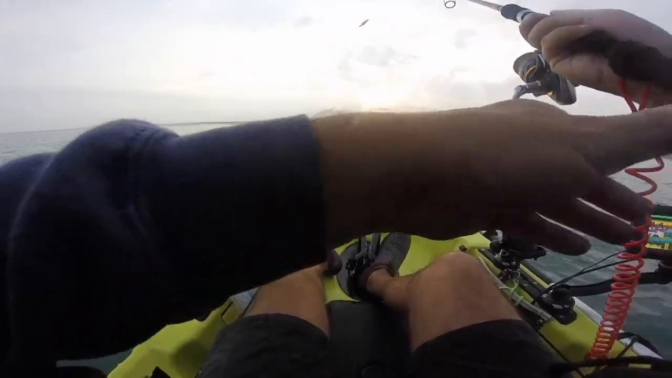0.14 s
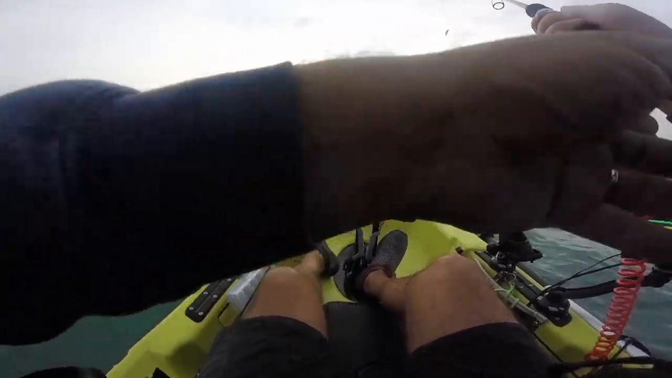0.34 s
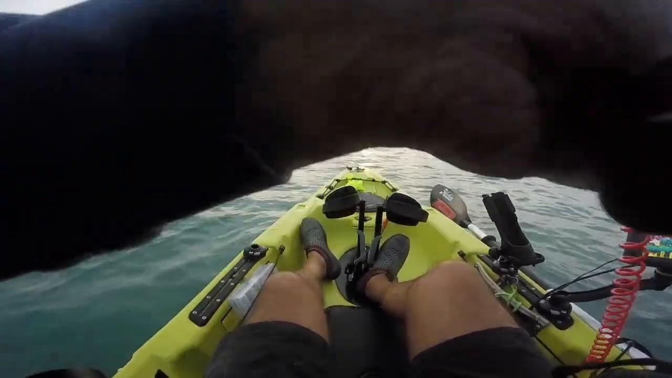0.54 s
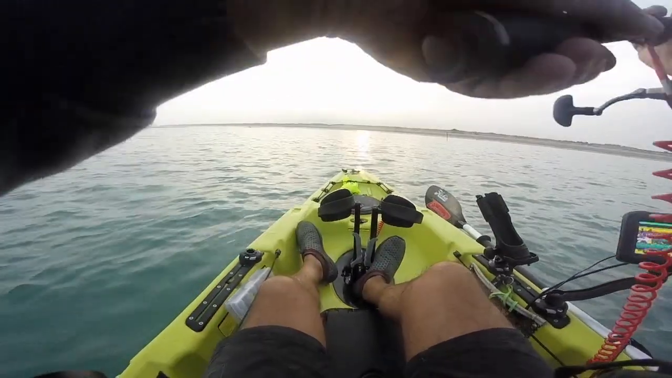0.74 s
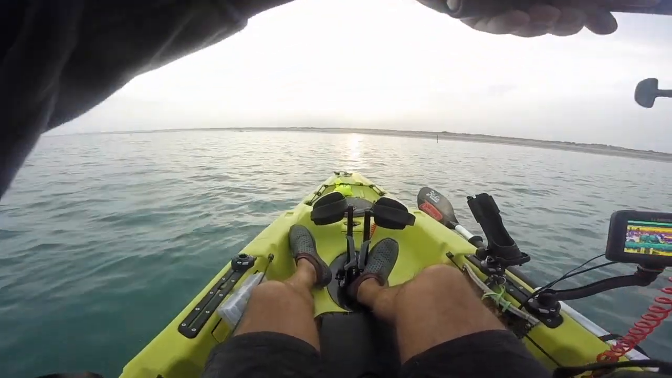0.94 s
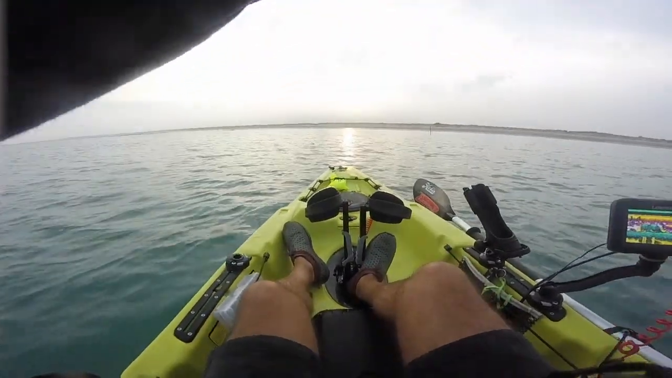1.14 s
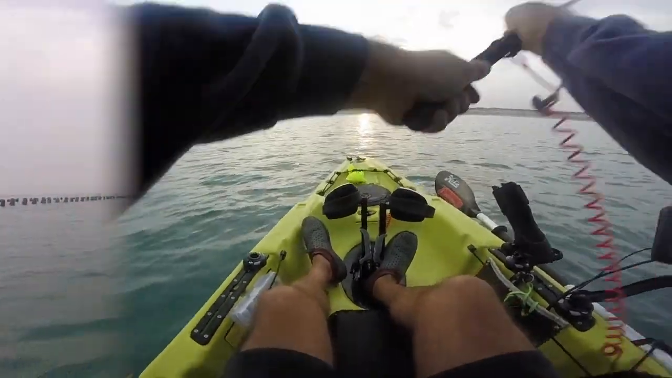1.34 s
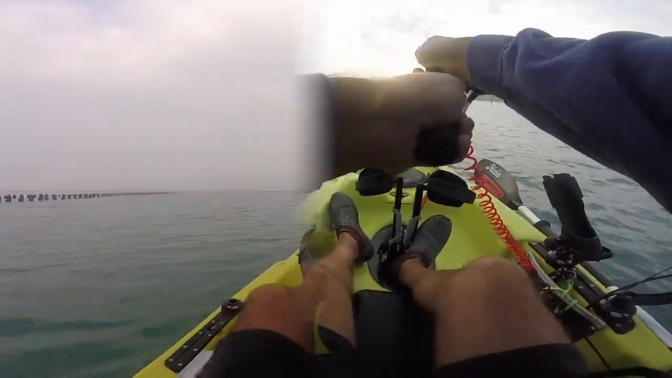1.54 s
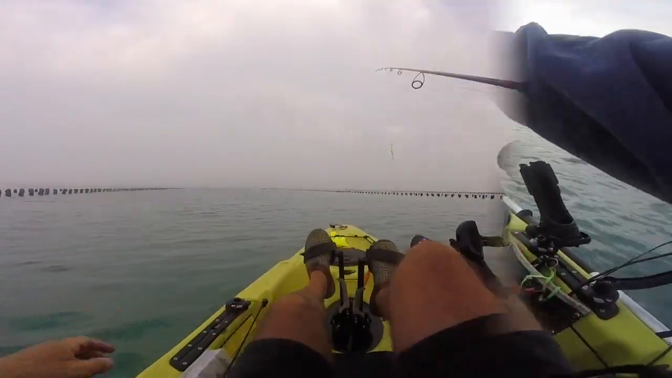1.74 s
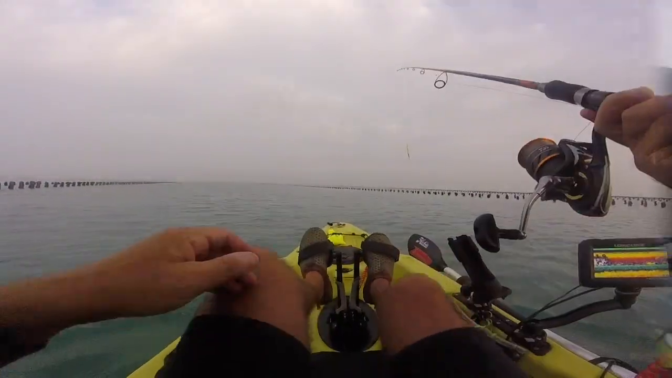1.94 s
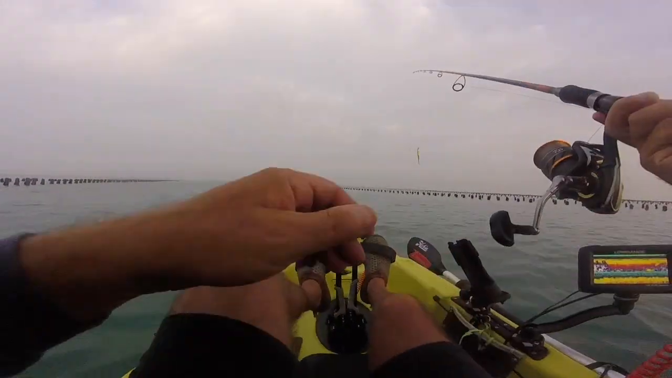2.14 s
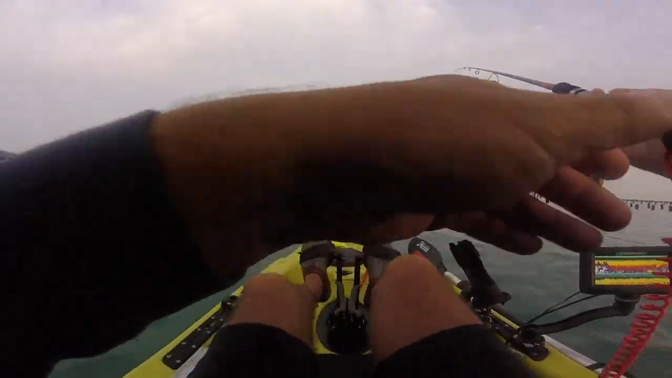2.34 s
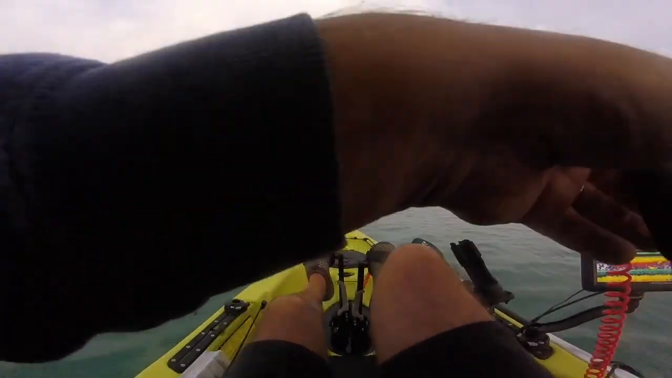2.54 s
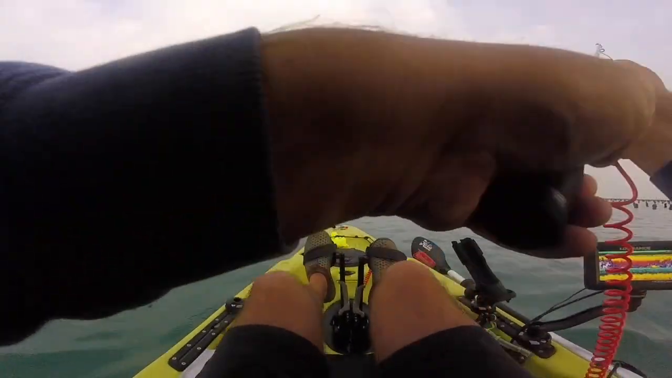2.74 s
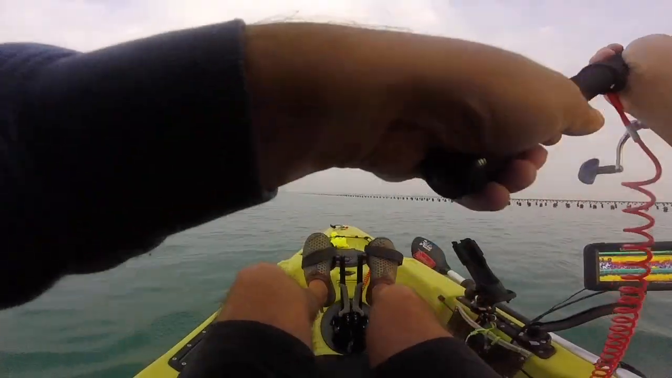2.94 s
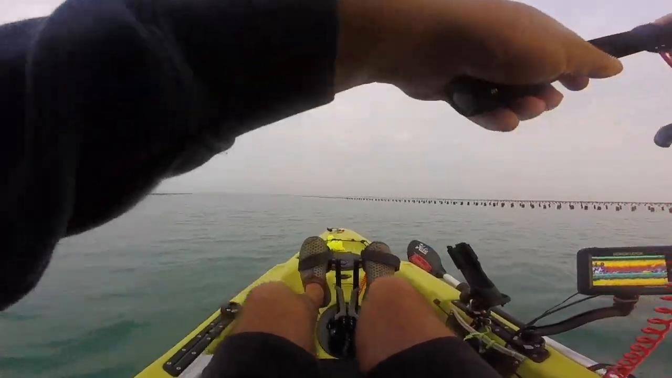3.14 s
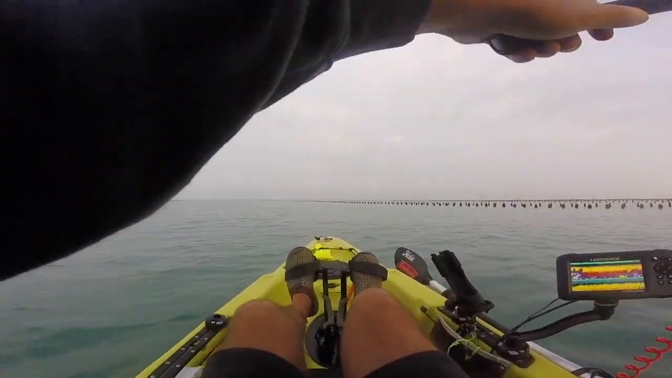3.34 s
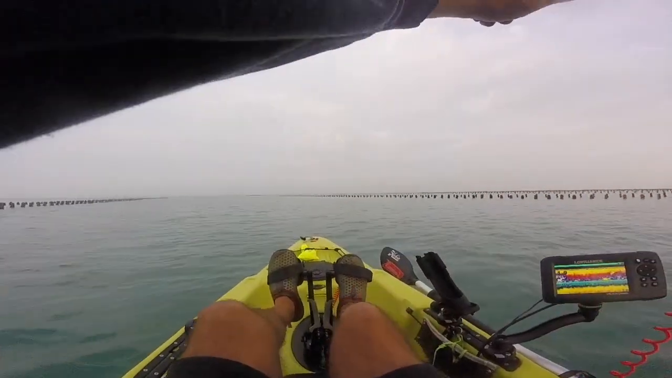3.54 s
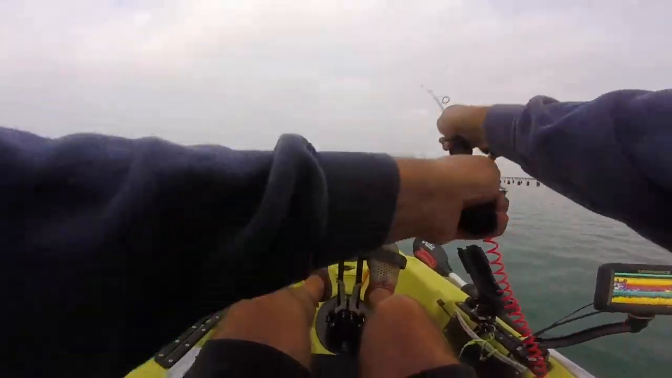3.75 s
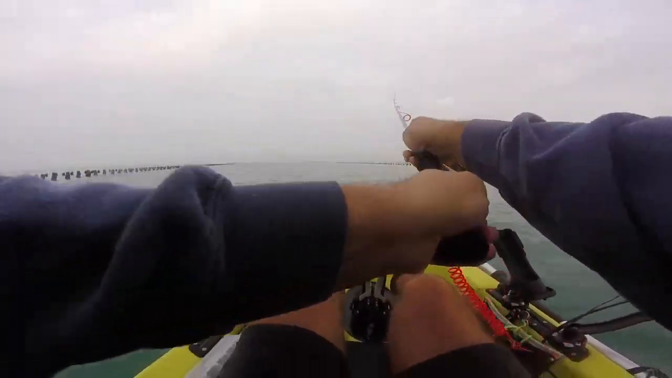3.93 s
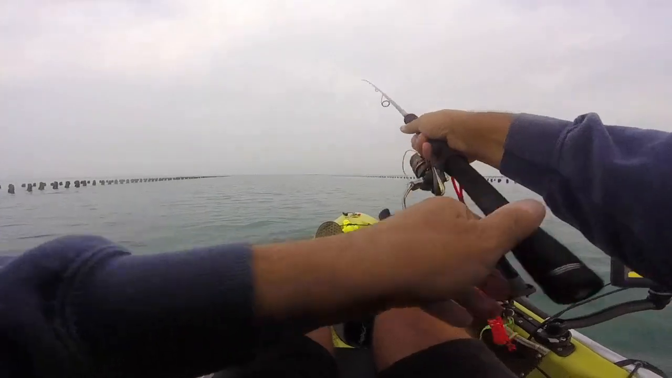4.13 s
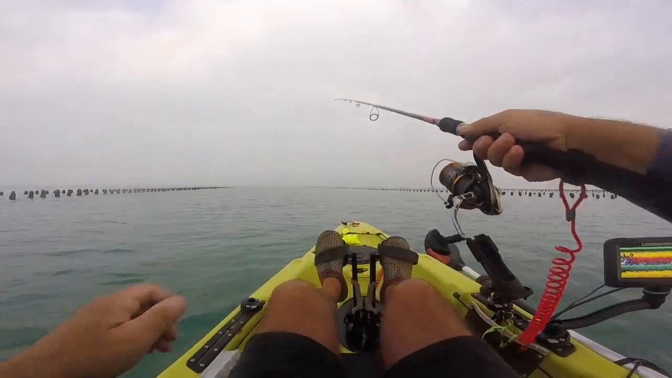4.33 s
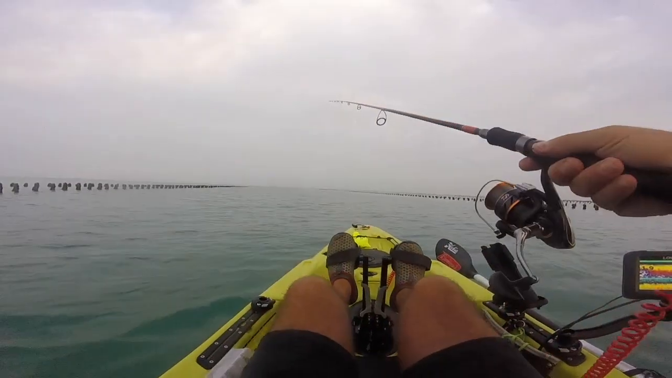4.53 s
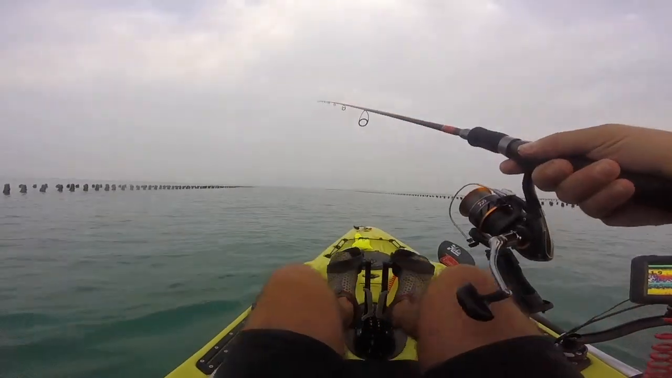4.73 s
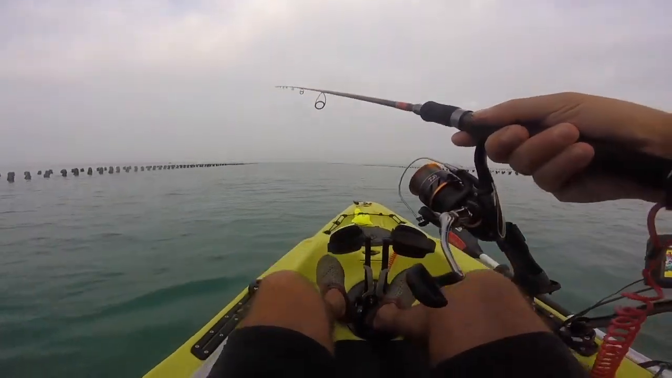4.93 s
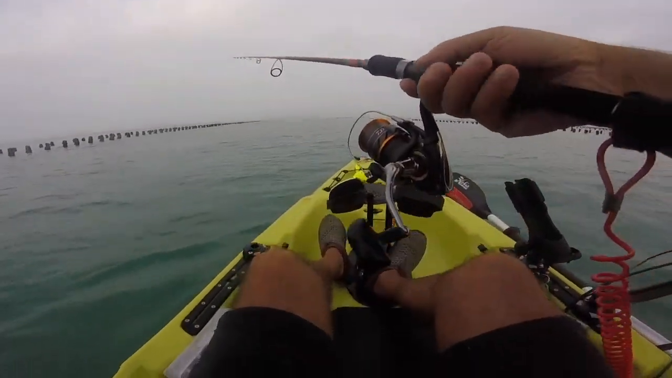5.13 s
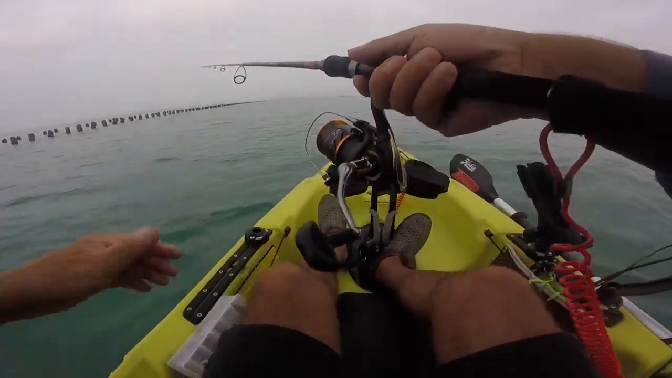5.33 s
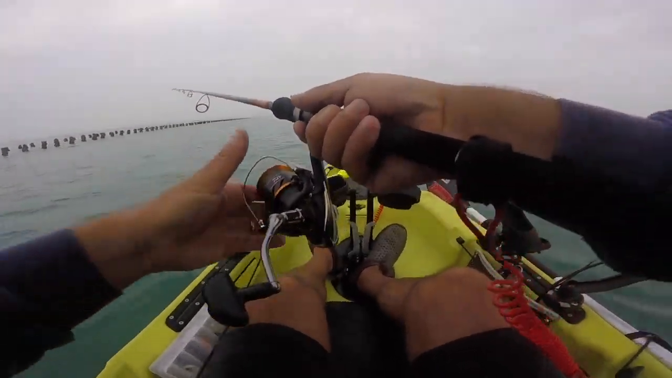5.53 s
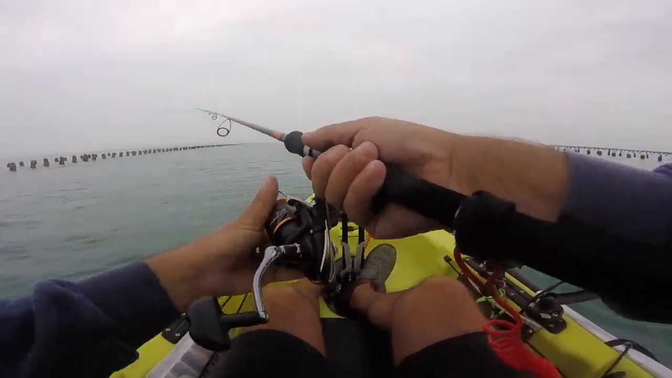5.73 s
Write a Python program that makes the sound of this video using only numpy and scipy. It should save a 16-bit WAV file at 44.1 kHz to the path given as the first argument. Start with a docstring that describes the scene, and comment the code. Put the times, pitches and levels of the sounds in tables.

```python
"""An angler in a kayak on a calm sea casts twice, heard by a body-worn camera in a plastic case.
Water and breeze wash low throughout. About 1 s in, the first swing drags a sleeve over the case:
a swelling swish, a sharp snap, a shove of air, then a knock as the arms stop. Tackle ticks faintly
until the second swing whips through at 3.7 s and ends in the hardest knock. The hull rocks gently,
the sleeve rustles on, the reel clicks at 5.3 s and two lighter knocks follow."""
import sys
import numpy as np
from scipy import signal
from scipy.fft import rfft, irfft, next_fast_len
from scipy.io import wavfile
from scipy.ndimage import uniform_filter1d

SR = 44100
rng = np.random.default_rng(int(sys.argv[2]) if len(sys.argv) > 2 else 0)


def persist_wave(psi):
    """Save psi, clipped to +-1, as 16-bit WAV."""
    counts = np.round(np.clip(psi, -1, 1) * 32767).astype(np.int16)
    wavfile.write(sys.argv[1], SR, np.atleast_2d(counts).T)


N = 254898
TIME = np.arange(N) / SR
TOP_HZ = 15400

# EQ curves of the noise layers: frequency_hz, gain_db
SEA_EQ = [(15, -14), (24, -2), (47, -0.5), (100, -6.5), (160, -8.5), (320, -13), (650, -18), (1100, -22),
          (1500, -22), (1900, -25), (2400, -29.5), (3200, -29), (6500, -38), (11000, -44.5), (15000, -53.5)]  # water and breeze
BRUSH_EQ = [(900, -8), (1300, -17), (1600, 6), (2300, -4), (3400, 3.5), (4200, -6), (4800, -16),
            (5600, -14), (7000, -39), (15000, -47)]  # sleeve on jacket
LOW_SWELL_EQ = [(5, -12), (14, -3.5), (25, 1), (45, -5.5), (80, -15), (160, -23), (500, -78.5)]  # shoved air and the rocking hull
CLOTH_EQ = [(300, -11), (750, -6.5), (1150, -8), (1700, 7), (1900, -1.5), (2150, -10.5), (2800, 2.5),
            (4000, -13), (5000, -17.5), (8000, -28), (16000, -44.5)]  # friction heard straight through the air
HISS_EQ = [(2000, -9), (4900, 4.5), (6300, 5.5), (7200, -0.5), (9000, 1.5), (11000, -8), (13000, -14),
           (15500, -24.5)]  # fibre hiss
RUMBLE_EQ = [(30, -7), (90, -0.5), (170, -1), (270, -2), (400, -13.5), (600, -20.5), (1500, -49.5)]  # cloth rumble
SNAP_EQ = [(200, -13), (600, -3), (950, -8), (1400, 3), (2500, 5.5), (4500, -1.5), (6500, -2), (9000, 1.5),
           (12000, -10), (16000, -26)]  # the crack of the snap

# resonances of the plastic case: pitch_hz, width_hz, gain_db
CASE_MODES = [(1200, 350, -24), (1534, 106, -1.5), (2005, 420, -4), (2212, 223, 2), (2510, 150, 0.5),
              (3320, 290, -10), (3720, 165, -10.5), (4075, 190, -11), (4400, 110, -18), (5580, 220, -19),
              (6380, 130, -26), (7500, 200, -24), (8350, 700, -42.5), (10800, 370, -33.5)]
# ring of the reel's metal: pitch_hz, gain_db, t60_s
REEL_MODES = [(1410, -23, 0.056), (1700, -12.5, 0.033), (1970, -10, 0.035), (2622, -3, 0.022),
              (3101, -27, 0.055), (3980, 0, 0.018), (4030, -13, 0.02), (6180, -6.5, 0.012)]
# light ticks of tackle and clothing, plus the dull thud of the knock at 5.46 s:
# start_s, peak_db, pitch_hz, spread_octaves, t60_s
TICKS_AND_THUD = [(0.6804, -47.5, 5000, .7, 0.0072), (1.1073, -42.5, 7750, 0.22, 0.0087),
                  (1.1787, -35, 7800, 0.22, 0.0073), (1.502, -37, 4500, 0.34, 0.017),
                  (2.3482, -52, 8000, .2, .0085), (2.5086, -40.5, 6150, 0.47, .0075),
                  (3.6987, -18, 2910, 0.6, 0.014), (3.893, -42, 7400, .4, .018),
                  (4.5197, -46, 6500, .45, .014), (4.794, -38, 2800, 0.31, 0.012),
                  (4.9258, -50.5, 6860, 0.26, .056), (5.4613, -37.5, 1150, 0.27, 0.024),
                  (5.711, -48.5, 4930, 0.78, 0.031)]
# runs of cloth crackle: start_s, end_s, crackles_per_s, typical_peak_db, pitch_hz, spread_octaves
CREASE_RUNS = [(0.969, 1.161, 70, -55.5, 7950, 0.16), (3.412, 3.556, 80, -44.5, 5540, 0.89),
               (3.803, 3.908, 40, -47, 6000, 0.68)]
# the sleeve brushes the jacket, further from the case: start_s, end_s, level_db
JACKET_BRUSHES = [(2.38, 2.52, -54), (4.194, 4.27, -57)]
# the sleeve never lies quite still: swish_db, hiss_relative_db, rumble_relative_db
SLEEVE_REST = (-64.5, -12.5, 1)
# arm moves drag the sleeve over the case: start_s, end_s, swish_db, hiss_relative_db, rumble_relative_db
ARM_MOVES = [(0.946, 1.13, -51.5, -20.5, -4.5), (1.208, 1.444, -36.5, -18.5, -10),
             (1.567, 1.577, -48, -27, -2.5), (2.454, 2.548, -54.5, -18, -7), (3.36, 3.426, -50, -24, 1.5),
             (3.47, 3.7, -39.5, -16.5, -7), (3.76, 3.791, -35, -16, -8), (3.857, 3.975, -44.5, -20, -5),
             (4.037, 4.296, -49, -16.5, -2.5), (4.35, 4.54, -52, -20, 2.5), (5.193, 5.674, -60, -14.5, -4)]
# the forward whip of each cast: top_speed_s, swish_db
CAST_WHIPS = [(1.354, -34), (3.698, -29)]
# air shoved by the two casts, then the hull rocking gently twice: crest_s, level_db
LOW_SWELLS = [(1.371, -23), (3.712, -22.5), (4.26, -39), (4.87, -42.5)]
# dull knocks on the case: start_s, peak_db, low_cut_hz, high_cut_hz
CASE_KNOCKS = [(0.565, -39.5, 1400, 6000), (0.6806, -43, 1400, 6000), (0.765, -42, 970, 2580),
               (1.2204, -22, 1300, 3200), (1.4498, -4.5, 1360, 2730), (1.5645, -28, 700, 2400),
               (2.0994, -41, 1000, 2600), (2.5926, -41.5, 1000, 2490), (2.845, -50, 1800, 2400),
               (3.4388, -26, 1200, 4000), (3.7952, 1, 1350, 2800), (3.8935, -21.5, 1420, 4100),
               (4.52, -31, 1600, 4500), (4.996, -37, 900, 3000), (5.128, -34.5, 1100, 1900),
               (5.4615, -15.5, 600, 3300), (5.711, -38, 1600, 4500)]


def undb(db):
    """Decibels to gain."""
    return 10 ** (np.asarray(db) / 20)


def unit(x):
    """Scale to rms 1."""
    return x / np.sqrt(np.mean(x ** 2))


def place(track, start_s, sound, peak_db):
    """Drop a one-shot onto the track at the given peak level."""
    i = int(start_s * SR)
    track[i:i + len(sound)] += (undb(peak_db) * sound / np.abs(sound).max())[:N - i]


def eq(x, curve):
    """Shape x with an EQ curve drawn over log frequency."""
    hz, db = np.transpose(curve)
    size = next_fast_len(len(x) + SR // 10)
    bins_hz = np.maximum(np.fft.rfftfreq(size, 1 / SR), 1)
    gain = undb(np.interp(np.log(bins_hz), np.log(hz), db))
    return irfft(rfft(x, size) * gain, size)[:len(x)]


def noise(curve):
    """Noise of rms 1, coloured by an EQ curve."""
    return unit(eq(rng.standard_normal(N), curve))


def flutter(rate_hz, depth_db):
    """A gain that glides between random levels, depth_db rms around unity."""
    step = int(SR / rate_hz)
    levels = np.repeat(rng.standard_normal(N // step + 1), step)
    return undb(depth_db * unit(uniform_filter1d(levels, step)[:N]))


def swell(start_s, end_s, rise_db_per_s, fall_db_per_s):
    """An envelope that reaches 1 at start_s, holds until end_s and fades."""
    early_s, late_s = np.maximum(start_s - TIME, 0), np.maximum(TIME - end_s, 0)
    return undb(-rise_db_per_s * early_s - fall_db_per_s * late_s)


def burst(t60_s, rise_s, size=4096):
    """A quick rattle of tiny contacts that dies away."""
    t = np.arange(size) / SR
    return rng.standard_normal(size) * (1 - np.exp(-t / rise_s)) * undb(-60 * t / t60_s)


def ring(modes, rise_s, size=4096):
    """Modes (pitch_hz, gain_db, t60_s) set ringing by a short contact."""
    t = np.arange(size) / SR
    tones = sum(undb(db - 60 * t / t60_s) * np.sin(2 * np.pi * hz * t) for hz, db, t60_s in modes)
    return tones * (1 - np.exp(-t / rise_s))


def tick(hz, octaves, t60_s):
    """A short contact that rings briefly in one band."""
    edges_hz = [hz / 2 ** octaves, min(hz * 2 ** octaves, TOP_HZ)]
    band = signal.butter(2, edges_hz, "bandpass", fs=SR, output="sos")
    return signal.sosfilt(band, burst(t60_s, rise_s=0.00054))


def slips(per_s, scatter_db):
    """Countless fibres catch and let go: dense clicks of uneven size."""
    sizes = undb(scatter_db * np.minimum(rng.exponential(size=N), 2 * np.pi))
    slipping = rng.random(N) < per_s / SR
    return unit(slipping * sizes * rng.choice([-1, 1], N))


def case_body(x):
    """The plastic case resonates; neighbouring modes swing in opposite polarity."""
    return sum((-1) ** k * undb(db) * signal.lfilter(*signal.iirpeak(hz, hz / width_hz, fs=SR), x)
               for k, (hz, width_hz, db) in enumerate(CASE_MODES))


def sea(level_db=-53):
    """The bed of water and breeze: the low wash laps unevenly at the hull, the far hiss stays smooth."""
    wash = noise(SEA_EQ)
    lows = signal.sosfiltfilt(signal.butter(2, 350, fs=SR, output="sos"), wash)
    lapping = lows * flutter(rate_hz=27, depth_db=1.1)
    far_hiss = (wash - lows) * flutter(rate_hz=3.8, depth_db=0.5)
    return undb(level_db) * (lapping + far_hiss)


def fidgets(per_s=2.6, peak_db=-51, spread_db=7, low_hz=1800, high_hz=3000):
    """Handled tackle gives barely audible ticks at random moments and pitches."""
    track = np.zeros(N)
    for when, size, pitch in rng.random((int(per_s * N / SR), 3)):
        hz = low_hz * (high_hz / low_hz) ** pitch
        db = peak_db + spread_db * (size - 0.5)
        place(track, when * TIME[-1], tick(hz, octaves=0.35, t60_s=0.01), db)
    return track


def jacket_brush():
    """Cloth on cloth: a broad, dry rasp."""
    gain = sum(undb(db) * swell(start_s, end_s, rise_db_per_s=520, fall_db_per_s=220)
               for start_s, end_s, db in JACKET_BRUSHES)
    return gain * unit(eq(slips(per_s=4600, scatter_db=4), BRUSH_EQ))


def creases(spread_db=12):
    """Folds of the sleeve buckle in short, irregular runs of crackle."""
    track = np.zeros(N)
    for start_s, end_s, per_s, db, hz, octaves in CREASE_RUNS:
        count = max(int((end_s - start_s) * per_s), 1)
        for k, (late, size) in enumerate(rng.random((count, 2))):
            at_s = start_s + (end_s - start_s) * (k + late) / count
            place(track, at_s, tick(hz, octaves, t60_s=0.0065), db + spread_db * (size - 0.5))
    return track


def ticks_and_thud():
    """Tackle and clothing tick lightly and one case knock gets a dull thud, each in its own band."""
    track = np.zeros(N)
    for start_s, db, hz, octaves, t60_s in TICKS_AND_THUD:
        place(track, start_s, tick(hz, octaves, t60_s), db)
    return track


def reel_click(start_s=5.2999):
    """A metal part of the reel clicks home and rings briefly."""
    track = np.zeros(N)
    place(track, start_s, tick(hz=3480, octaves=0.53, t60_s=0.018), peak_db=-26.5)
    place(track, start_s, ring(REEL_MODES, rise_s=0.0011), peak_db=-26)
    return track


def snap(start_s=1.2761, thump_hz=160, thump_t60_s=0.019):
    """Something flicks across the microphone: a bright crack and a short ping on a low thump."""
    track, t = np.zeros(N), np.arange(SR // 10) / SR
    crack = eq(burst(t60_s=0.01, rise_s=0.00095), SNAP_EQ)
    ping = ring([(1370, 0, 0.017), (6300, -3.5, 0.013)], rise_s=0.00082)
    thump = np.sin(2 * np.pi * thump_hz * t) * undb(-60 * t / thump_t60_s)
    place(track, start_s, crack, peak_db=-10.5)
    place(track, start_s, ping, peak_db=-16.5)
    place(track, start_s, thump, peak_db=-18.5)
    return track


def arm_envelopes(whip_hiss_db=-26, whip_rumble_db=-9):
    """Arm motion rides the swish, hiss and rumble faders; each move stops faster than it starts."""
    gestures = [(np.ones(N), *SLEEVE_REST)]
    for start_s, end_s, *levels in ARM_MOVES:
        gestures.append((swell(start_s, end_s, rise_db_per_s=116, fall_db_per_s=240), *levels))
    for top_speed_s, db in CAST_WHIPS:
        whip = swell(top_speed_s, top_speed_s, rise_db_per_s=184, fall_db_per_s=375)
        gestures.append((whip, db, whip_hiss_db, whip_rumble_db))  # pressed cloth sounds dull
    power = sum(np.outer(undb([db, db + hiss_db, db + rumble_db]), shape) ** 2
                for shape, db, hiss_db, rumble_db in gestures)
    return np.sqrt(power)


def air_and_hull(swish_gain, draught_db=-11, tail_db=-14, tail_hold_s=0.1):
    """Low swells with weaker tails: air shoved by the two casts, then the hull rocking gently."""
    power = (undb(draught_db) * swish_gain) ** 2  # a moving arm also stirs a draught
    for crest_s, db in LOW_SWELLS:
        crest = swell(crest_s, crest_s, rise_db_per_s=260, fall_db_per_s=482)
        tail = swell(crest_s, crest_s + tail_hold_s, rise_db_per_s=260, fall_db_per_s=139)
        power += (undb(db) * crest) ** 2 + (undb(db + tail_db) * tail) ** 2
    sub = signal.hilbert(noise(LOW_SWELL_EQ))
    rounded = unit(sub.real / (np.abs(sub) + 1.1))  # soft compression evens out the peaks
    return np.sqrt(power) * rounded


def sleeve_swish(swish_gain, hiss_gain, rumble_gain, direct_db=-4.5):
    """Sleeve friction rings the case; some arrives direct, with fibre hiss on top and rumble below."""
    grip = flutter(rate_hz=70, depth_db=1.64)  # the cloth grabs and slides by turns
    friction = slips(per_s=9000, scatter_db=3.5) * grip
    ringing = unit(case_body(friction))
    direct = unit(eq(slips(per_s=9000, scatter_db=2.5) * grip, CLOTH_EQ))
    hiss = unit(eq(friction + 0.64 * rng.standard_normal(N), HISS_EQ))
    rumble = noise(RUMBLE_EQ) * flutter(rate_hz=30, depth_db=2)
    return swish_gain * (ringing + undb(direct_db) * direct) + hiss_gain * hiss + rumble_gain * rumble


def knocks(rebound_s=0.000818, rebound_db=-7.5, scuff_db=-24.5):
    """A double contact and a scuff ring the case; the spot and softness of each hit set its band."""
    track, contacts = np.zeros(N), np.zeros(2048)
    contacts[0], contacts[int(rebound_s * SR)] = 1, undb(rebound_db)
    for start_s, db, low_hz, high_hz in CASE_KNOCKS:
        band = signal.butter(2, [low_hz, high_hz], "bandpass", fs=SR, output="sos")
        hit = case_body(signal.sosfilt(band, contacts))
        scuff = case_body(signal.sosfilt(band, burst(t60_s=0.026, rise_s=0.003)))
        place(track, start_s, hit, db)
        place(track, start_s, scuff, scuff_db + db / 2)  # gentle knocks carry a larger share of scuff
    return track


def scene():
    """The mono mix at the camera's microphone."""
    swish_gain, hiss_gain, rumble_gain = arm_envelopes()
    motion = sleeve_swish(swish_gain, hiss_gain, rumble_gain) + jacket_brush() + air_and_hull(swish_gain)
    return (motion + sea() + snap() + knocks() + reel_click() + ticks_and_thud()
            + creases() + fidgets())[None]


def record(dry):
    """The camera clips at full scale and cuts the top end."""
    high_cut = signal.ellip(8, 0.2, 70, TOP_HZ, fs=SR, output="sos")
    return signal.sosfilt(high_cut, np.clip(dry, -1, 1))


dry = scene()
out = record(dry)
persist_wave(out)
```